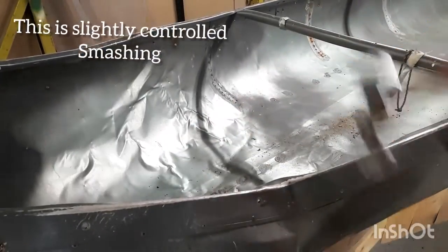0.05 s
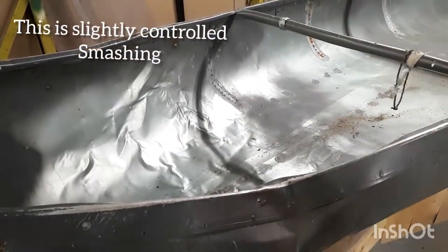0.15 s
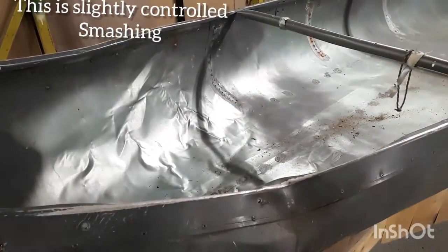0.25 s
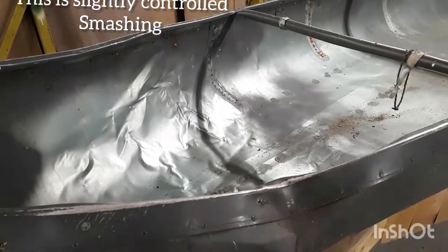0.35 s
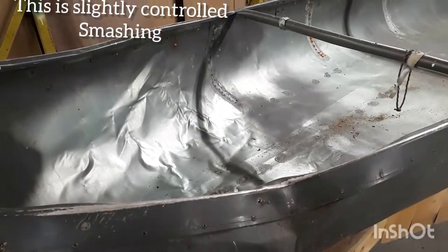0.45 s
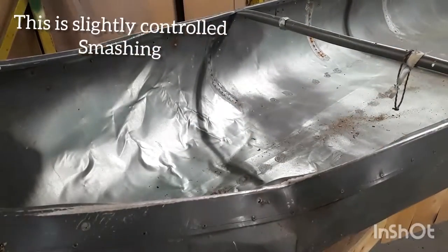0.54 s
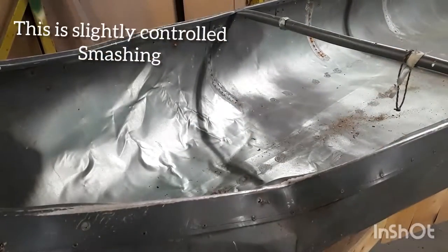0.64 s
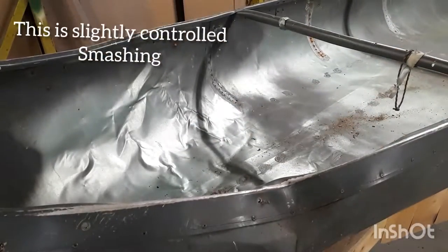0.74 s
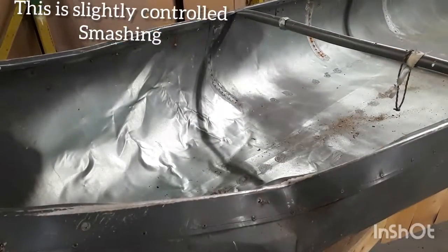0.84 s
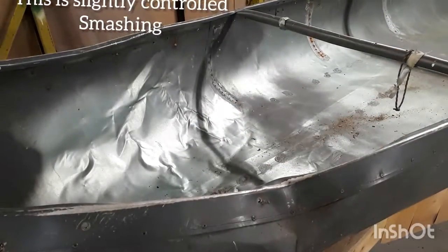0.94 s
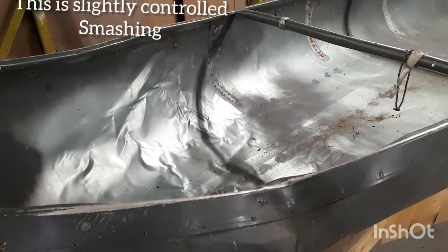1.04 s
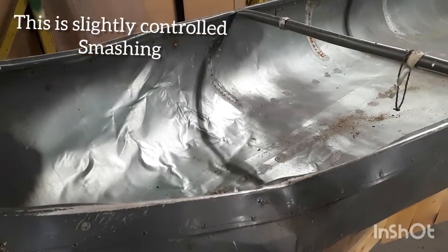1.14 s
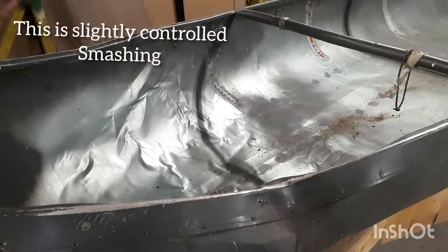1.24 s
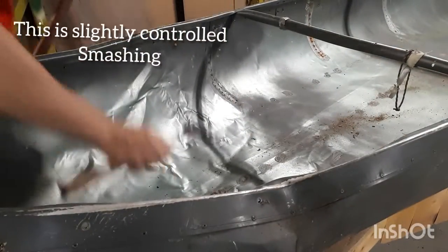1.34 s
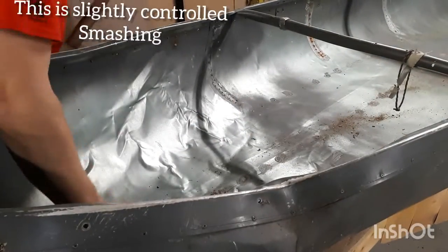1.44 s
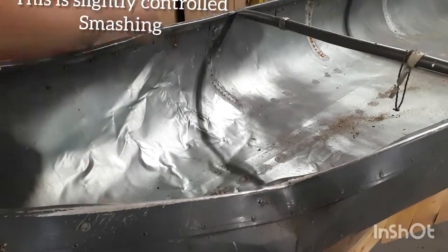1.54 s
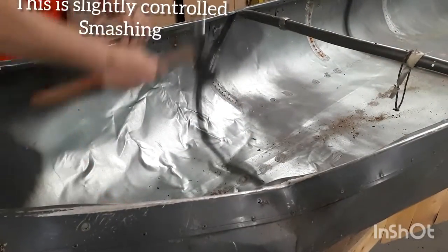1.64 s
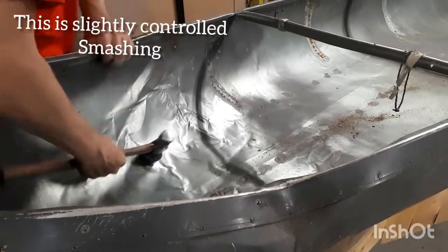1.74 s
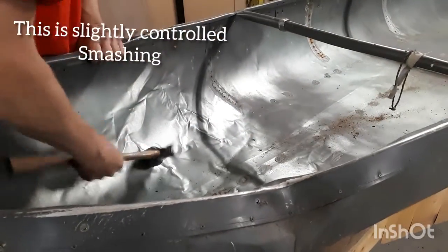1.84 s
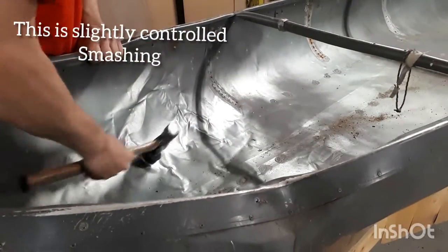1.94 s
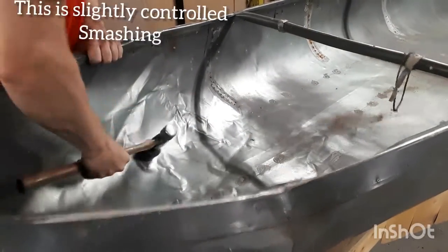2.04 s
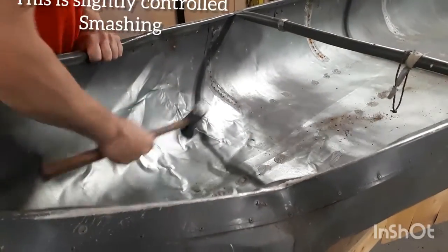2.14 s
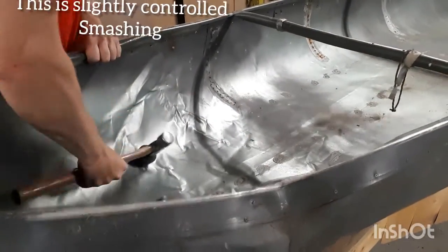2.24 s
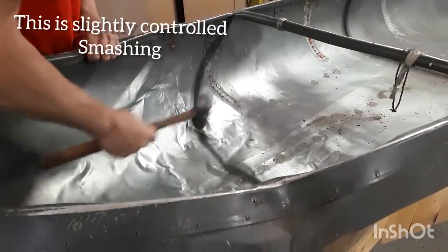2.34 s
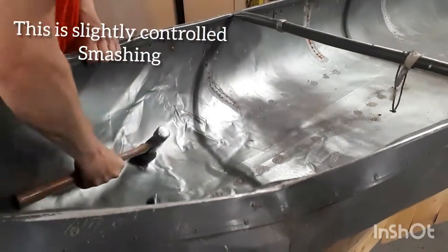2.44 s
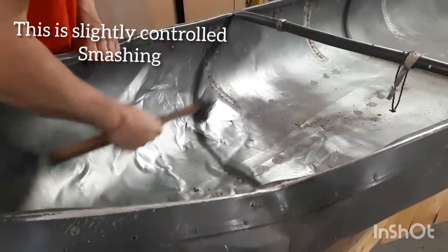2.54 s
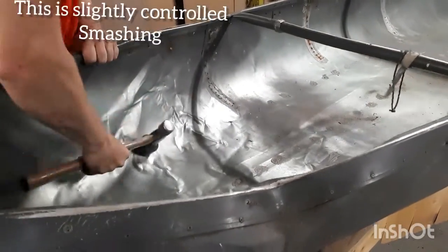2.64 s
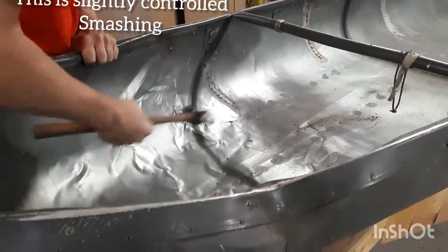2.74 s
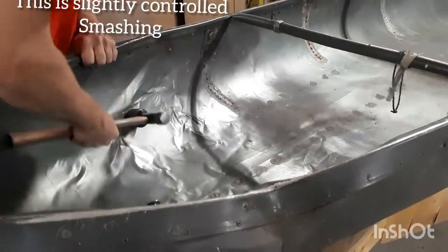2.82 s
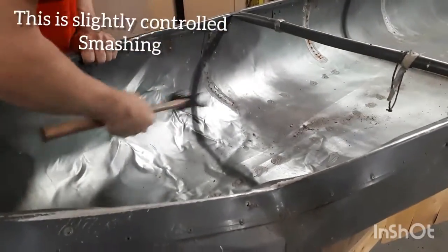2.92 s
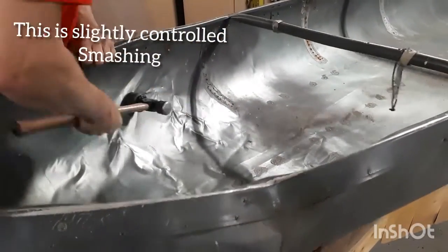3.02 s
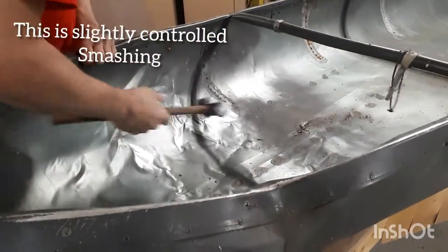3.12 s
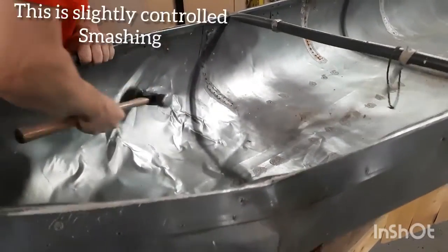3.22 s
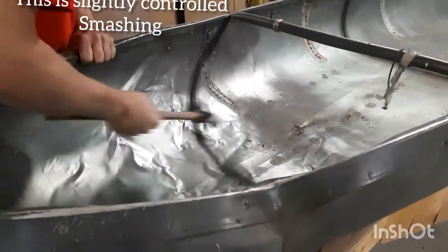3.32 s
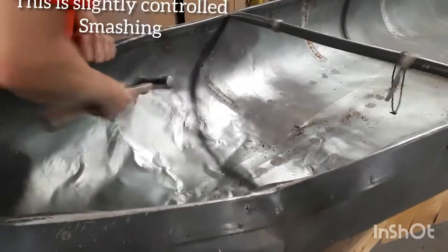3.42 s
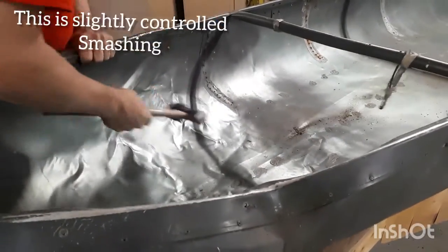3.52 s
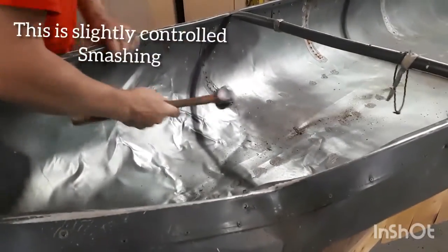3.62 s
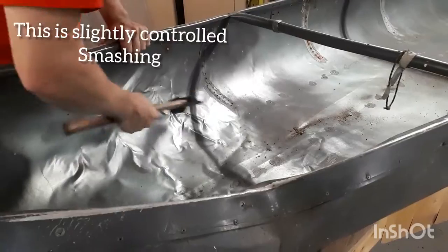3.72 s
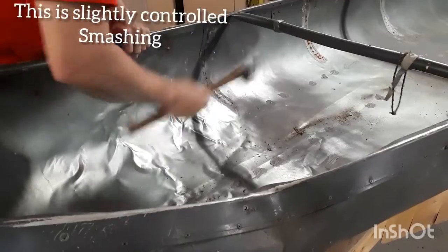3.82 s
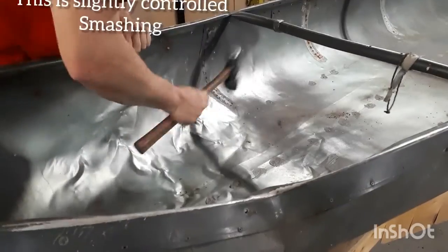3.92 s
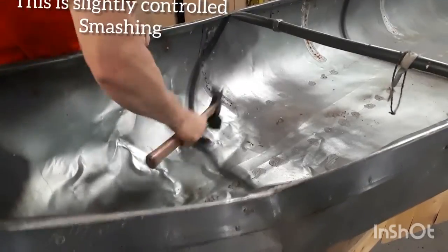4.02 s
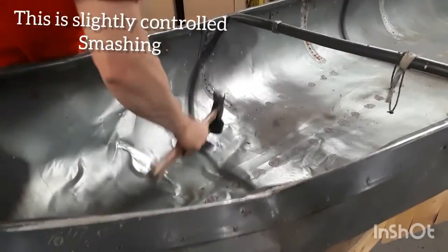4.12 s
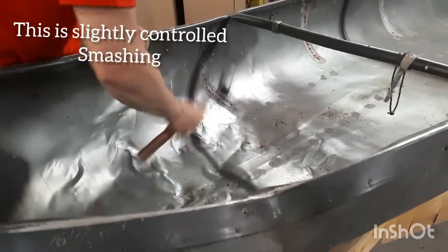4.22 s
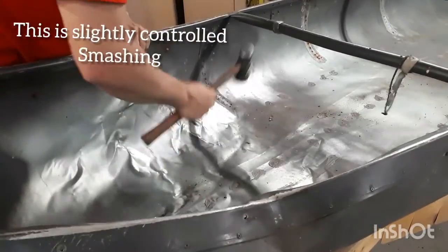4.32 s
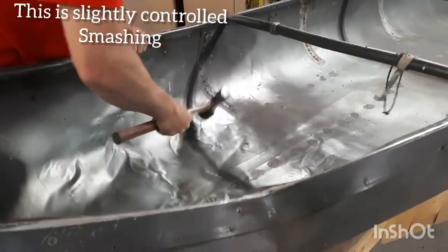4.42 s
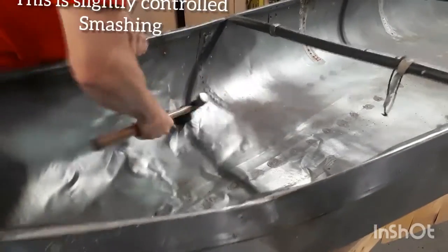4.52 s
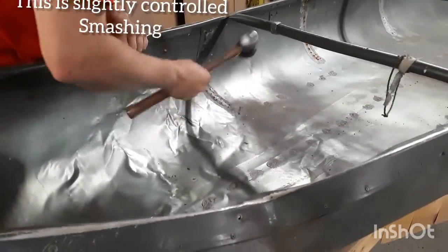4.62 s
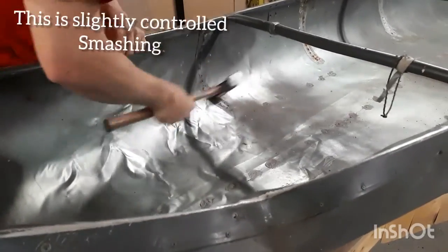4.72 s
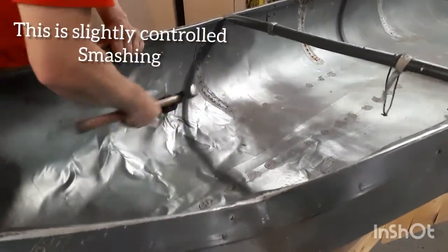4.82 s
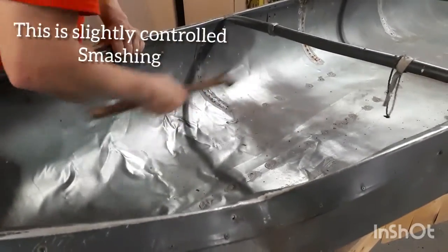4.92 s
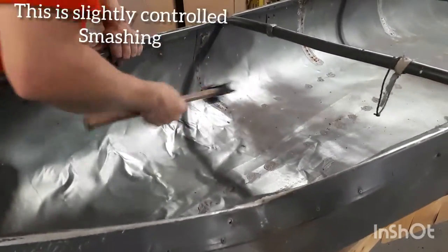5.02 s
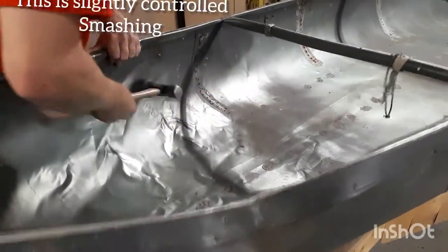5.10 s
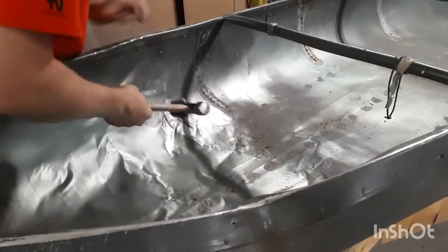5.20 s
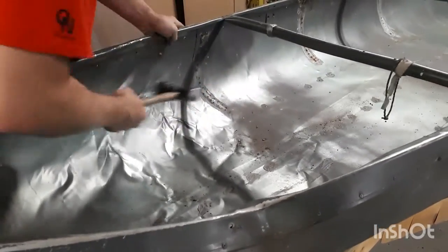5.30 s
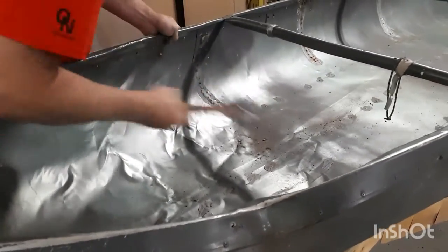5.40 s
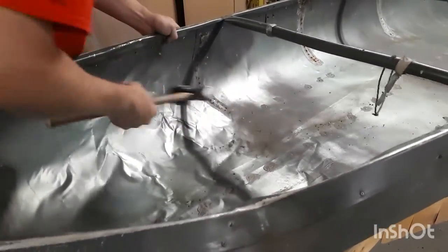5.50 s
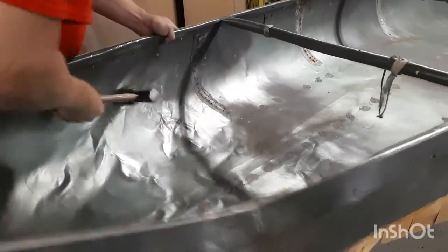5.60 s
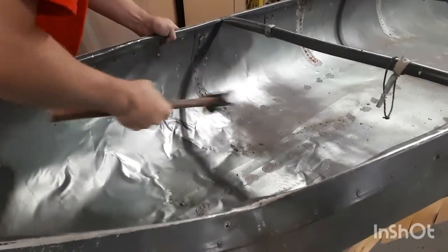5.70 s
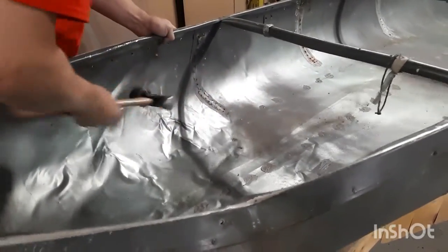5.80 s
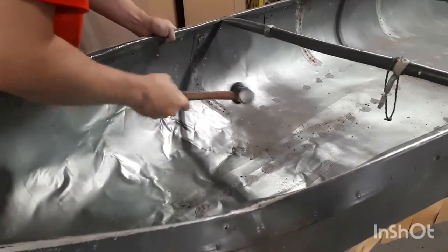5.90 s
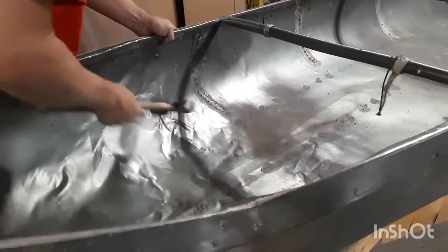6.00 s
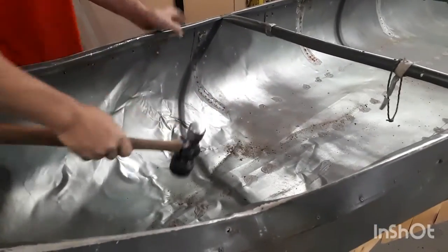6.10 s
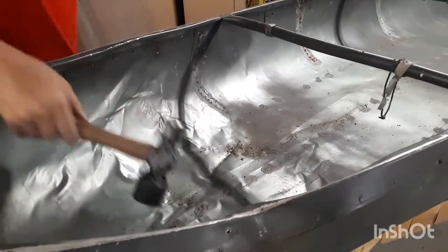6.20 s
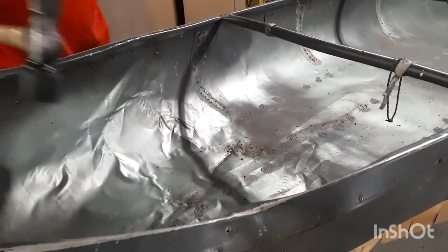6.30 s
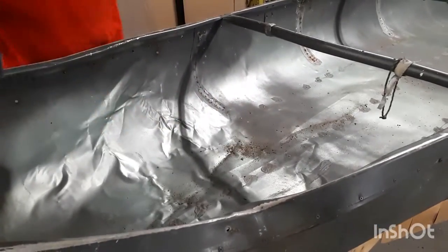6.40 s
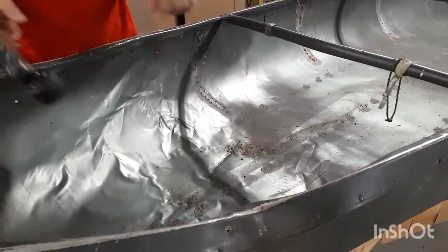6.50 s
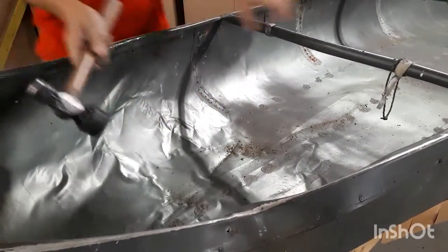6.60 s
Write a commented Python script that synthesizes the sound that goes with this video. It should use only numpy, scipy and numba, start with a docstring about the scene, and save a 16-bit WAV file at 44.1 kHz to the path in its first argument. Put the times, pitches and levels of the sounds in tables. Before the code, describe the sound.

A close phone hears a thin aluminium hull on supports in a workshop. From 0 to 1.4 s there is low rumble, breathy treble hiss with a slight whine at first, light rubbing, a faint knock, a tiny tick near 0.5 s and soft bumps around 1.2 s. Dull thuds gather at 1.4-1.5 s, and a heavy muffled one lands with the first blow at about 1.75 s. From 2.0 s loud hammer strokes come roughly every 0.2 s, each a swelling, crumpling burst of sheet noise with hollow boom and short metallic ring. After a gap at 3.4 s, a strong hit at 3.85 s begins a faster run, about seven per second, until 5.1 s. Another gap, then four spaced blows from 5.45 to 6.0 s. The ring dies quickly; from 6.3 to 6.65 s rubbing, hiss, rumble and dull knocks return. Loud peaks are rounded off.

```python
"""Hammering dents out of an aluminium hull

A hammer beats a thin aluminium hull that rests on trestles in a workshop, a phone close by. Each blow is a
swelling burst of dense sheet noise, with decaying sines for hull modes and struck panel. Duller knocks use the
same voices; banded noise makes the shop rumble, treble hiss, ticks and rubbing. The phone turns down and rounds
the loudest peaks and trims the top; the deepest bass is taken out."""
import sys
import numpy as np
from scipy import signal
from scipy.fft import irfft, next_fast_len
from scipy.io import wavfile
from scipy.ndimage import uniform_filter1d
from numba import njit

SR = 44100
rng = np.random.default_rng(int(sys.argv[2]) if len(sys.argv) > 2 else 0)


def inscribe(sig):
    """Save sig as 16-bit PCM at rate SR to the path in sys.argv[1].

    A 1-D sig is mono; a 2-D sig holds one channel per row.
    Samples are clipped to [-1, 1] before scaling.
    """
    pcm = np.round(np.clip(np.atleast_2d(sig).T, -1, 1) * 32767)
    wavfile.write(sys.argv[1], SR, pcm.astype(np.int16))


N = 293337
TIME = np.arange(N) / SR  # s
BANDS_HZ = 25 * 2 ** np.arange(0, 9.5, 1 / 3)  # third-octave centres

# Hammer blows. Each row: nominal time in seconds, body, boom, clang and splash levels in dB,
# rise in ms, ring as a factor, low and high note of the struck panel in Hz.
BLOWS = [(1.738, -11.5, -13, -18.0, -59, 4.2, 0.67, 124, 483),
         (2.035, -7, -2.5, -8, -22, 9.9, 0.95, 151, 709),
         (2.219, -9, -8.5, -9.5, -24.5, 11.5, 0.84, 151.5, 353),
         (2.404, -7.5, -7, -12.0, -21.5, 12, 1.12, 309, 528),
         (2.612, -11, -11, -13.5, -28.5, 12.5, 1.2, 159.5, 511),
         (2.811, -11, -9, -14, -29.5, 6, 1.06, 188, 583),
         (3.007, -10.5, -13.5, -14.5, -35, 11.3, 0.8, 169.6, 565),
         (3.216, -13.5, -11.5, -12, -31, 13, 0.93, 189.4, 694),
         (3.426, -7, -14, -8, -22.5, 11.3, 0.83, 183.6, 559),
         (3.846, -7, -1, -7, -22, 17.3, 0.94, 223.6, 387), (3.978, -8.5, -9, -13, -25, 20, 0.89, 158, 478),
         (4.104, -7.5, -6.5, -10, -20.5, 6, 0.97, 179, 485),
         (4.239, -8.5, -5.5, -10, -28.5, 18.4, 0.77, 290, 561),
         (4.389, -8.5, -5.5, -11, -28.5, 6.2, 1.05, 224, 723),
         (4.524, -6, -6, -6.5, -21.5, 9.2, 0.86, 277, 860), (4.66, -8, -14, -8, -19.5, 8.3, 0.98, 300, 659),
         (4.8, -5, -6.5, -6.5, -19.5, 13.1, 0.77, 169, 473), (4.957, -10, -14, -13, -31, 15, 0.8, 266, 468),
         (5.097, -10, -11, -14, -33, 12, 0.82, 195, 637),
         (5.445, -10, -12, -16.5, -33.5, 11.7, 0.9, 256, 596),
         (5.609, -6.5, -9.5, -8.5, -20, 15, 0.82, 177, 386),
         (5.794, -6, -12, -7.5, -23.0, 14.2, 0.8, 144, 476),
         (5.979, -9, -15, -15.5, -33, 10.6, 0.95, 250, 411)]
# Dull knocks of the hull on its trestles or under a hand. Each row: nominal time in seconds,
# body, boom and clang levels in dB, rise in ms, ring as a factor, low and high panel note in Hz.
KNOCKS = [(0.155, -31.5, -32, -38, 14.3, 0.83, 190, 995), (0.939, -45, -30, -42, 13, 0.55, 169, 437),
          (1.202, -28.5, -34, -53, 8.9, 1, 180, 415), (1.383, -30.5, -53, -46, 10.4, 0.97, 135, 908),
          (1.439, -24.5, -17.5, -35, 24.6, 0.9, 166, 488), (1.477, -10.5, -7.5, -28, 10.3, 0.56, 165, 367),
          (1.545, -17.5, -15.5, -38, 1.9, 0.54, 182, 470), (1.761, -4, -9.5, -30, 4.7, 0.45, 223, 521),
          (1.843, -33, -45, -35, 2.1, 0.28, 179, 343), (1.873, -27.5, -23.5, -34, 9.7, 0.54, 172, 346),
          (2.086, -15, -18, -25, 6.5, 0.39, 163, 370), (2.549, -20, -23, -50, 2.9, 0.57, 237, 537),
          (2.784, -29.5, -30, -47, 3.5, 0.4, 199, 510), (2.878, -37, -16, -34, 7.9, 0.49, 191, 535),
          (2.92, -16, -20, -37, 7.5, 0.33, 130, 506), (3.089, -22.5, -25, -47, 14.8, 0.4, 210, 565),
          (3.692, -23.5, -35, -39, 1.3, 0.47, 271, 374), (3.711, -29, -23, -43, 5.1, 0.88, 242, 388),
          (3.955, -22, -11.5, -42, 25.0, 0.6, 151, 478), (5.264, -21.5, -22, -41, 11.2, 0.88, 138, 483),
          (6.31, -39, -44, -60, 9.3, 0.56, 180, 473), (6.395, -26.5, -34, -42, 19.7, 0.97, 287, 637),
          (6.503, -24, -28, -48, 18, 1, 190, 505), (6.612, -23, -34, -43, 10.5, 0.99, 203, 475)]
# Colour regions of an impact. One row: centres of boom, body, clang and splash in Hz.
REGION_HZ = [160, 600, 2500, 9500]
# Low modes of the hull. Each row: frequency in Hz, relative level in dB, basic t60 in seconds.
HULL_MODES = [(206, -11, 0.1), (367, -6, 0.31), (449.3, -1.5, 0.25), (551, -4.5, 0.36), (605, -8.5, 0.24),
              (687, -3, 0.22), (854, -12.5, 0.17), (910, -18, 0.2), (1127, -12, 0.18), (1250, -9, 0.17),
              (1382, -3, 0.068)]
# The sheet's countless upper modes. Each row: frequency in Hz, dB on top of the impact's colour,
# basic t60 in seconds.
SHEET = [(39.6, -49, 0.33), (66.6, -45, 0.76), (118, -6, 0.17), (181, -5, 0.29), (366, -6.5, 0.24),
         (800, -3, 0.23), (1510, -2, 0.19), (3130, -2.5, 0.18), (5940, -0.5, 0.15), (8700, -6.5, 0.15),
         (12900, 1, 0.1), (16000, -0.5, 0.1)]
# Stereo width. Each row: frequency in Hz, likeness of left and right from 0 to 1.
LIKENESS = [(30, 1), (60, 0.95), (150, 1), (300, 0.92), (600, 0.69), (1100, 0.06), (4000, 0.02)]
# Small dry ticks. Each row: start in seconds, relative level in dB.
TICKS = [(0.544, -27.5), (3.5827, -26), (3.714, -28.5)]
# Shop background, mostly lower from about 2 s to 6.3 s. Each row: time in seconds, # rumble and middle control
# levels in dB.
SHOP = [(0, -32.5, -42.5), (0.18, -31, -35.5), (0.4, -35, -41.5), (0.74, -30.5, -40.5), (0.93, -34, -42),
        (1.45, -33.5, -38.5), (1.66, -33, -40.5), (1.98, -29.5, -44.5), (2.5, -48, -47.5),
        (2.94, -29.5, -37.5), (3.3, -52, -42.5), (3.8, -47, -54.5), (4.1, -45, -54), (5.1, -37, -54),
        (5.43, -46.5, -57), (6.27, -40.5, -57.5), (6.45, -29.5, -40), (6.65, -24.5, -36.5)]
# Colour of the rumble. Each row: frequency in Hz, relative dB per third octave.
RUMBLE = [(25, -34), (40, -25), (60, -18), (120, -12.5), (170, -1.5), (300, -10.5), (500, -10)]
# Colour of the hiss. Each row: frequency in Hz, relative dB per third octave.
HISS = [(3500, -5.5), (5000, -4), (7800, -2.5), (9300, -4.5), (12000, -1.5), (15500, -7.5)]
# Resonances in the hiss. Each row: centre in Hz, width in Hz, relative level in dB.
WHINE = [(2950, 600, -8), (4960, 860, -6), (7340, 1500, -5), (8600, 420, -8), (11700, 700, -13.5)]
# Spells of treble hiss. Each row: start and end of the hold in seconds, hiss level in dB,
# level of its resonances in dB.
SPELLS = [(0, 0.169, -36.5, -27.5), (0.886, 1.24, -35, -60), (1.323, 1.46, -37.5, -60),
          (1.515, 1.535, -38, -60), (1.685, 2.044, -38, -60), (2.248, 2.756, -53.5, -60),
          (2.803, 2.94, -41.5, -33.5), (3.148, 3.274, -42.5, -38), (3.35, 3.707, -52, -60),
          (3.84, 4.1, -46, -60), (4.64, 4.66, -36, -60), (4.9, 4.95, -55, -60), (4.998, 5.24, -53, -60),
          (5.472, 6.12, -55.5, -60), (6.424, 6.65, -36, -60)]
# A hand or sleeve drags along the skin. Each row: time in seconds, control level in dB.
DRAG = [(0, -39.5), (.15, -38), (.3, -59), (6.25, -62), (6.33, -43), (6.4, -32), (6.47, -33.5), (6.55, -29),
        (6.65, -35)]

SPELL_RISE_DB_S, SPELL_FALL_DB_S = 603, 217
WASH_MIDDLE_DB, WASH_HISS_DB, WASH_T60_S = -21, -36, 0.52  # levels relative to each blow's body
QUIET_DB = -42  # usual level of the middle
FLOOR_DB, FLOOR_STEEP = -54.5, 1.23  # treble floor at QUIET_DB, and its dB per dB of the middle
PAN_DB, KNOCK_PAN_DB = 0.6, 0.3  # left minus right
BOOM_RING, BOOM_RING_PER_DB = 0.57, -0.05  # factors; a strong boom spends itself sooner
KNOCK_BOOM_RING = 0.84
KNOCK_SPLASH_DB = -13  # relative to the clang
LEAD = 0.3  # part of the rise that comes before the nominal time
MODES_DB, PANEL_DB, PANEL_T60_S = -16.5, -1.0, 0.18
SPOT_DB, WAVER_DB = 5.0, 2.0  # full range of each band's offset; depth of the uneven ring
CRASH_DB, CRASH_SPEED = -9.5, 1.55  # faster layer under the ring, speed as a factor
TOP_HZ = 15800


def undb(db):
    """Turns decibels into amplitude."""
    return 10 ** (np.asarray(db) / 20)


def on_log(hz, table, order=1):
    """Reads one column of a frequency table on a log-frequency axis."""
    table = np.array(table, float)
    return np.interp(np.log(hz), np.log(table[:, 0]), table[:, order])


def stereo_band(hz, width, size, modal_db=0):
    """Noise of rms 1 in a bell-shaped band, alike left and right in the bass, nearly unrelated in the treble."""
    size_fft = next_fast_len(size)
    f = np.arange(size_fft // 2 + 1) * SR / size_fft
    inside = np.flatnonzero(np.abs(f - hz) < 2 * width)
    bell = np.exp(-2 * ((f[inside] - hz) / width) ** 2)
    real, imaginary = rng.standard_normal((2, 2, len(inside)))
    # a sheet answers unevenly: random gains at points 25 Hz apart
    peaks = np.interp(f[inside], np.arange(SR // 50) * 25., rng.standard_normal(SR // 50))
    spectrum = np.zeros((2, len(f)), complex)
    spectrum[:, inside] = (real + 1j * imaginary) * bell * undb(modal_db * peaks)
    mid, side = irfft(spectrum, size_fft)[:, :size]
    like = np.clip(on_log(hz, LIKENESS), 0, 1)
    pair = np.sqrt(1 + like) * mid + np.sqrt(1 - like) * side * np.array([[1], [-1]])
    return pair / np.sqrt(np.mean(pair ** 2))


def walk(rate):
    """Random levels drawn at the given rate in Hz and smoothed twice; spread near 1."""
    k = int(SR / rate)
    steps = np.repeat(rng.standard_normal(N // k + 1), k)
    return 1.31 * uniform_filter1d(uniform_filter1d(steps, k), k)[:N]


def add(out, s, sound):
    """Mixes a sound in from time s."""
    i = int(s * SR)
    out[:, i:i + sound.shape[1]] += sound[:, :N - i]


def spells(order):
    """Gain of the hiss spells from one level column: quick rise, hold, slower fall."""
    gain = np.zeros(N)
    for row in SPELLS:
        before = SPELL_RISE_DB_S * np.maximum(row[0] - TIME, 0)
        after = SPELL_FALL_DB_S * np.maximum(TIME - row[1], 0)
        gain += undb(row[order] - before - after)
    return gain


def wash():
    """Gain of what hangs in the air: an exponential decay after each blow."""
    return sum((TIME > s) * undb(body - 60 * np.abs(TIME - s) / WASH_T60_S) for s, body, *_ in BLOWS)


def shop():
    """Rumble, middle and hiss follow their own levels as banded noise; every band flickers a little alone."""
    s, *columns = np.transpose(SHOP)
    rumble_db, middle_db = (np.interp(TIME, s, column) for column in columns)
    tail = wash()
    rumble = undb(rumble_db)
    centre = undb(middle_db) + undb(WASH_MIDDLE_DB) * tail
    floor = undb(FLOOR_DB + FLOOR_STEEP * (middle_db - QUIET_DB))
    hiss = floor + spells(order=2) + undb(WASH_HISS_DB) * tail
    out = np.zeros((2, N))
    for hz in BANDS_HZ:
        low = rumble * undb(on_log(hz, RUMBLE + [(1000, -22.0), (3000, -54)]))
        middle = centre * undb(-2.5 - 2.3 * np.log2(hz / 1200) ** 2)
        high = hiss * undb(on_log(hz, [(300, -60), (1500, -13.5)] + HISS))
        flicker_db = np.interp(np.log(hz), np.log([200, 4000]), [3.0, 1.1])
        flicker = undb(flicker_db * walk(14))
        level = np.sqrt(low ** 2 + middle ** 2 + high ** 2)
        out += level * flicker * stereo_band(hz, hz / 4, N)
    whine = sum(undb(db) * stereo_band(hz, width, N) for hz, width, db in WHINE)
    return out + spells(order=3) * whine


def drag():
    """Rubbing rustles the panels in the low middle, in uneven grains."""
    rustle = stereo_band(450., 450., N) + undb(-2.5) * stereo_band(950., 700., N)
    return undb(np.interp(TIME, *np.transpose(DRAG)) + 2.4 * walk(60)) * rustle


def sheet_noise():
    """The dense upper modes as bands of noise, more jagged in frequency toward the treble."""
    return np.array([stereo_band(hz, hz / 4, N, modal_db=np.interp(hz, [500, 1500], [0, 2.4]))
                     for hz in BANDS_HZ])


def ring_sheet(colour, after, spot, sheet, waver):
    """The crash under the head spreads out fast; the sheet rings on below it, band by band."""
    gain = undb(on_log(BANDS_HZ, colour) + on_log(BANDS_HZ, SHEET) + SPOT_DB * spot)[:, None]
    length = on_log(BANDS_HZ, colour, order=2) * on_log(BANDS_HZ, SHEET, order=2)
    fall = after / length[:, None]
    shape = gain * (np.exp(fall) + undb(CRASH_DB) * np.exp(CRASH_SPEED * fall)) * waver
    return np.einsum("bt,bct->ct", shape, sheet)


def ring_modes(colour, t, after, ring, luck):
    """Low hull modes as decaying sines; each spot drives them differently and dents shift them a little."""
    mode_hz, mode_db, mode_t60 = np.transpose(HULL_MODES)
    detune, drive, phase = luck.reshape(3, -1, 1)
    hz = mode_hz[:, None] * (1 + 0.065 * (detune - .5))
    strength = undb(MODES_DB + on_log(mode_hz, colour) + mode_db)[:, None] * undb(11.3 * (drive + 0.5))
    dying = np.exp(after / (ring * np.clip(mode_t60, .05, .26)[:, None]))
    return np.sum(strength * dying * np.sin(2 * np.pi * (hz * t + phase)), axis=0)


def ring_panel(notes_hz, levels_db, factors, phases, t, after):
    """The struck panel sings two decaying sines, a low boom note and a higher body note."""
    sound = np.zeros(len(t))
    for hz, db, factor, phase in zip(notes_hz, levels_db, factors, phases):
        dying = np.exp(after / (factor * PANEL_T60_S))
        sound += undb(PANEL_DB + db) * dying * np.sin(2 * np.pi * (hz * t + phase))
    return sound


def hull(events):
    """Every impact rings sheet, low modes and struck panel with its own colour, rise and length."""
    out, size = np.zeros((2, N)), SR // 2
    t = np.arange(size) / SR
    sheet = sheet_noise()
    # each region of the ring fades unevenly, with its own random wavering
    region = np.searchsorted([330, 1200, 5000], BANDS_HZ)
    waver = undb(WAVER_DB * np.array([walk(110) for _ in REGION_HZ]))[region]
    for s, body, boom, clang, splash, pan, rise_ms, ring, boom_ring, *notes_hz in events:
        luck = rng.random(3 * len(HULL_MODES) + 3)
        spot = rng.random(len(BANDS_HZ)) - .5
        colour = np.transpose([REGION_HZ, [boom, body, clang, splash], [boom_ring, ring, ring, ring]])
        rise = (1 + LEAD) * max(rise_ms, .5) / 1000  # s
        after = -np.log(1000) * np.maximum(t - rise, 0)  # decay exponent, 60 dB per t60
        start = int(luck[-1] * (N - size))  # a random stretch of the sheet noise
        part = slice(start, start + size)
        sound = ring_sheet(colour, after, spot, sheet[:, :, part], waver[:, part])
        sound += ring_modes(colour, t, after, ring, luck[:-3])
        sound += ring_panel(notes_hz, (boom, body), (boom_ring, ring), luck[-3:-1], t, after)
        # the sheet buckles under the head, so the sound swells over some ms
        sound *= np.clip(t / rise, 0, 1) ** 1.68
        sound *= undb(np.array([[pan], [-pan]]) / 2)
        add(out, s - LEAD * rise_ms / 1000, sound)
    return out


def knocks():
    """The hull bumps its supports: impacts whose splash follows the clang."""
    return [(s, body, boom, clang, clang + KNOCK_SPLASH_DB, KNOCK_PAN_DB, rise, ring, KNOCK_BOOM_RING, *notes)
            for s, body, boom, clang, rise, ring, *notes in KNOCKS]


def ticks():
    """Grit or a rope end clicks against the metal: short decaying bursts of treble noise."""
    out, t = np.zeros((2, N)), np.arange(SR // 20) / SR
    for s, db in TICKS:
        add(out, s, undb(db - 4.5) * np.exp(-t / 0.0073) * stereo_band(8600.0, 9200.0, len(t)))
    return out


def blows():
    """Hammer blows crumple the sheet: impacts whose boom dies sooner the stronger it is."""
    return [(s, body, boom, clang, splash, PAN_DB, rise, ring, BOOM_RING + BOOM_RING_PER_DB * boom, *notes)
            for s, body, boom, clang, splash, rise, ring, *notes in BLOWS]


def scene():
    """Mixes the shop, the rubbing, the impacts on the hull and the ticks."""
    return shop() + drag() + hull(knocks() + blows()) + ticks()


@njit
def limit(x, top, ratio, attack, release):
    """Follows the louder channel and turns both down above the top level; speeds are fractions per sample."""
    y, level = np.empty_like(x), 0.
    for i in range(x.shape[1]):
        peak = max(abs(x[0, i]), abs(x[1, i]))
        level += (peak - level) * (attack if peak > level else release)
        y[:, i] = x[:, i] * min(1., (top / (level + 1e-9)) ** (1 - 1 / ratio))
    return y


def record(dry):
    """The phone limits, rounds peaks, favours the left port in the treble and cuts the top; the deepest bass is
    taken out."""
    held = np.tanh(limit(dry, top=0.41, ratio=1.25, attack=0.085, release=0.001)) / 1.305
    held = signal.sosfilt(signal.butter(2, 45, "highpass", fs=SR, output="sos"), held)
    treble = signal.sosfilt(signal.butter(2, [6500, 12500], "bandpass", fs=SR, output="sos"), held)
    held = held + 0.27 * treble * np.array([[1], [-1]])
    return signal.sosfilt(signal.ellip(8, .2, 70, TOP_HZ, fs=SR, output="sos"), held)


dry = scene()
out = record(dry)
inscribe(out)
```